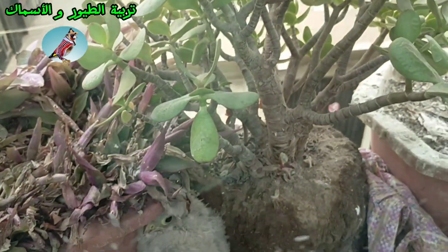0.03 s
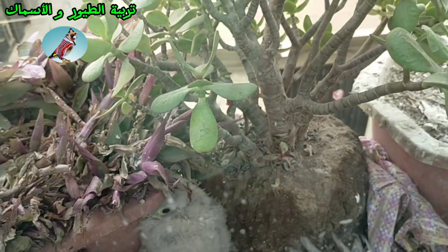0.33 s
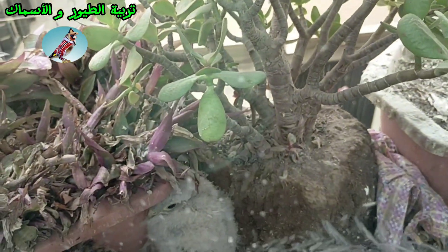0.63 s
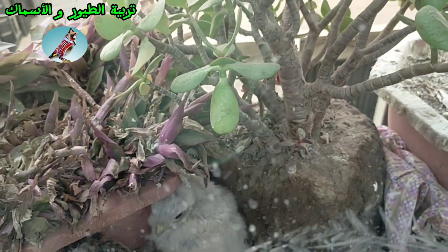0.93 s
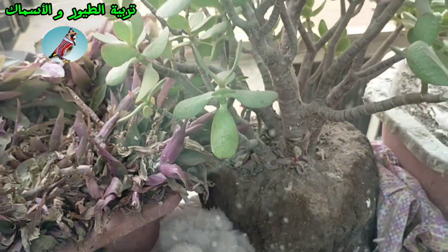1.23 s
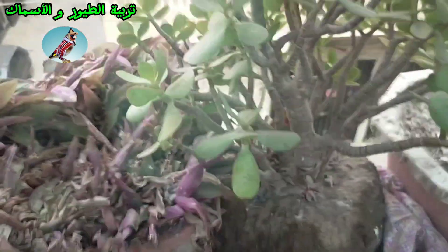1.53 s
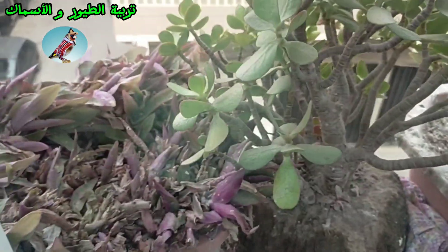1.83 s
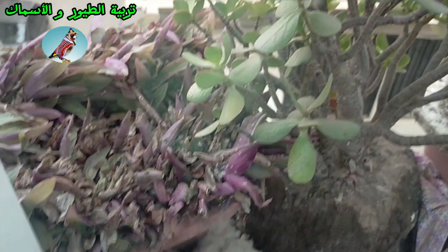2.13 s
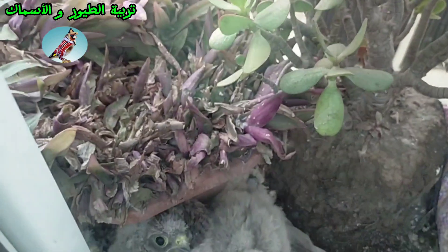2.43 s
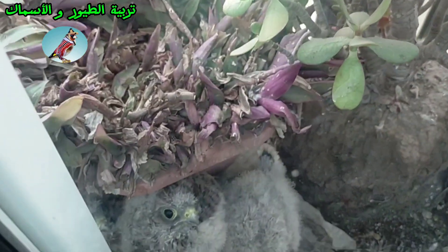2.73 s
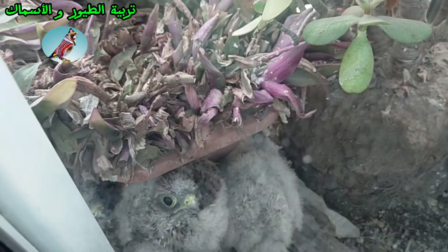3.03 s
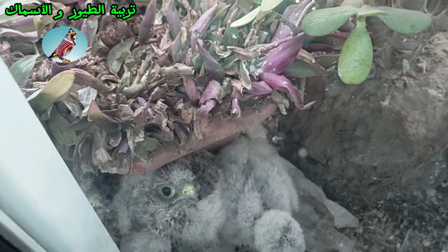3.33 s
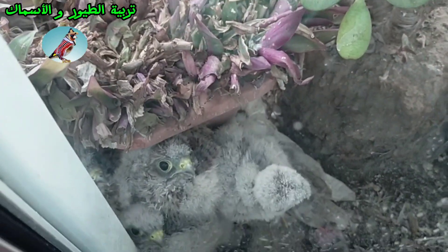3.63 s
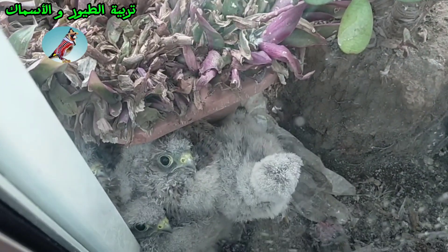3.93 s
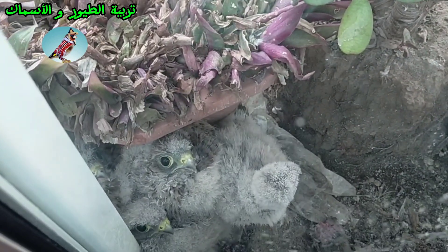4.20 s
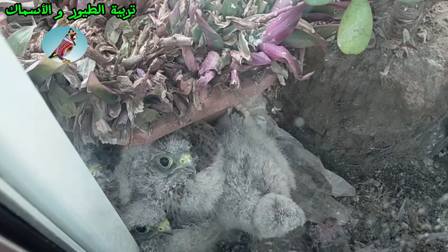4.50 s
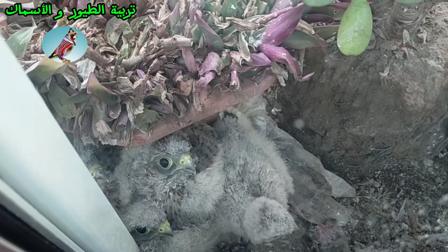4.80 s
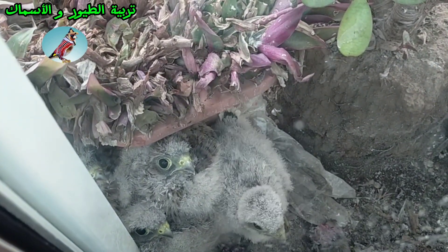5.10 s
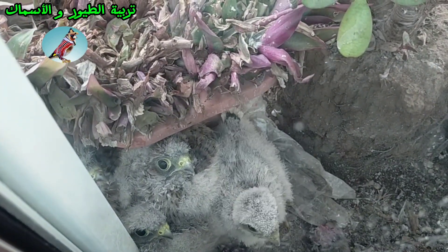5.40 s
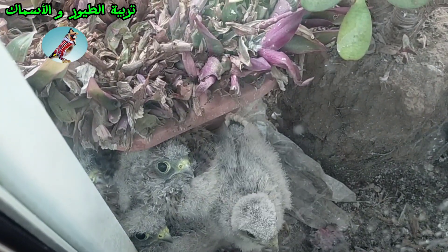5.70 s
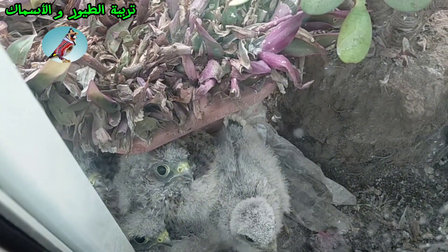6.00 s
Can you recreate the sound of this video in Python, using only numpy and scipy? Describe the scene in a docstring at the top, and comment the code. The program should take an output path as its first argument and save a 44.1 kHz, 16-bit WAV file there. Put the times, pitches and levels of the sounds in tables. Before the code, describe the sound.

A falcon chick begs up close with a fast high trill, thin whines and a hoarse chitter, over camera knocks and outdoor air.

```python
"""In a nook among flower pots on a ledge, kestrel chicks beg close to a hand-held camera.
The syrinx whistles when it vibrates regularly and rasps when it beats unevenly; the throat filters both.
A trill, cracking after each note, sinks to three thin whines, then restarts as a faster, hoarser chitter.
A faint peep and light ticks join in, and the walls throw short echoes back.
Over the outdoor air, the camera rumbles, rubs, clacks and rings as it is handled."""
import sys
import numpy as np
from scipy import signal
from scipy.fft import rfft, irfft, next_fast_len
from scipy.io import wavfile
from scipy.ndimage import uniform_filter1d

SR = 44100
rng = np.random.default_rng(int(sys.argv[2]) if len(sys.argv) > 2 else 0)


def int16_out(signal):
    """Quantize to a 16-bit WAV file."""
    q = np.round(np.clip(np.atleast_2d(signal).T, -1, 1) * 32767)
    wavfile.write(sys.argv[1], SR, q.astype(np.int16))


N = 266893
TIME = np.arange(N) / SR
# the throat's filter on the rasp: frequency_hz, trill_gain_db, chitter_gain_db
RASP_FILTER = [(450, -44, -55), (676, -24.5, -6), (860, -13.5, -6.5), (1050, -10, -3.5), (1345, -6.5, 2),
               (1427, 6, 4), (1623, 10.5, 6.5), (1940, -14, -15), (1990, -6.5, -2), (2545, -12, -7.5),
               (2520, -13, -12), (3300, -18.5, -28), (4630, -37.5, -80), (12000, -50, -59)]


def amp(db):
    """Decibels to amplitude ratio."""
    return 10 ** (np.asarray(db) / 20)


def unit(x):
    """Normalisation to rms 1."""
    return x / np.sqrt(np.mean(x ** 2) + 1e-20)


def follow(rows, at, **options):
    """Linear interpolation along a table's first column: one curve for each other column."""
    first, *columns = np.transpose(rows)
    return [np.interp(at, first, c, **options) for c in columns]


def colour(x, spectrum):
    """Spectral shaping by a gain curve drawn on a log-frequency axis."""
    hz, db = np.transpose(spectrum)
    log_hz = np.log(np.fft.rfftfreq(len(x), 1 / SR) + 1)
    return irfft(rfft(x) * amp(np.interp(log_hz, np.log(hz), db)), len(x))


def noise(spectrum, size=N):
    """Filtered white noise of rms 1."""
    return unit(colour(rng.standard_normal(next_fast_len(size)), spectrum)[:size])


def wander(rate_hz):
    """Random modulation: low-passed noise of rms 1."""
    size = next_fast_len(N)
    low_pass = np.exp(-(np.fft.rfftfreq(size, 1 / SR) / rate_hz) ** 2)
    return unit(irfft(rfft(rng.standard_normal(size)) * low_pass, size)[:N])


def add(mix, start_s, sound):
    """Superposition of a sound on the mix."""
    part = mix[max(round(start_s * SR), 0):][:len(sound)]
    part += sound[:len(part)]


def note_times(first_s, rate, count):
    """Repetition: each note follows the last by one period of the current rate."""
    times = [first_s]
    while len(times) < count:
        times.append(times[-1] + 1 / follow(rate, times[-1])[0])
    return np.array(times)


def air_and_handling():
    """Outdoor air, with the hand's rumble and friction noise; overlapping moves add in power."""
    # noise spectra: frequency_hz, relative_db
    air_spectrum = [(20, 10), (50, -1.5), (110, -12.5), (300, -17.5), (800, -22.5), (1500, -22.5),
                    (2800, -26), (4000, -32), (4700, -34.5), (4950, -26.5), (5300, -38), (10000, -41.5),
                    (16000, -32.5)]
    rumble_spectrum = [(15, -4.5), (40, 5), (70, -6), (140, -10.5), (200, -21), (300, -25.5), (900, -62)]
    rub_spectrum = [(100, -5.5), (500, -1.5), (1000, -1.5), (2200, 1.5), (4000, -13.5), (5500, -17.5),
                    (7800, -13.5), (10500, -24.5), (14500, -14.5), (16000, -19)]
    # moves of the hand on the camera: peak_s, half_length_s, rumble_db, rub_db
    hand_moves = [(0.08, 0.16, -24, -42.5), (0.291, 0.13, -25, -40), (0.558, 0.13, -33, -51),
                  (0.977, 0.13, -49, -51), (1.436, 0.38, -55, -47.5), (2.397, 0.61, -52.5, -54.5),
                  (3.359, 0.065, -48, -53), (3.612, 0.12, -40, -55), (6.05, 0.13, -61, -51)]
    rumble, rub = amp(-54), amp(-61)  # the hand held still
    for peak_s, half_length_s, rumble_db, rub_db in hand_moves:
        swell = np.exp(-((TIME - peak_s) / half_length_s) ** 2)
        rumble = np.hypot(rumble, amp(rumble_db) * swell)
        rub = np.hypot(rub, amp(rub_db) * swell)
    hand = rumble * noise(rumble_spectrum) + rub * amp(0.5 * wander(77)) * noise(rub_spectrum)
    air = amp(-44 + 1.8 * wander(5.3)) * noise(air_spectrum)
    return hand + air


def whistle(hz, bright_db):
    """Source and filter: harmonics of the syrinx's tone swell as they cross the throat's resonances."""
    # the throat's filter on the overtones: frequency_hz, gain_db
    resonances = [(2920, -13.5), (3080, -24.5), (3300, -27), (4400, -36.5), (5000, -37.5), (5900, -39),
                  (6700, -36.5), (7400, -37.5), (8300, -50.5), (8900, -45.5), (10300, -47.5), (11800, -49),
                  (13300, -35), (14500, -54.5)]
    phase = 2 * np.pi * np.cumsum(hz) / SR
    overtones = sum(amp(follow(resonances, k * hz)[0]) * np.sin(k * phase) for k in range(2, 10))
    return np.sqrt(2) * (np.sin(phase) + amp(bright_db) * overtones)


def rasp(hz, jitter, chaos, throat):
    """Subharmonics: the syrinx beats unevenly, once in four cycles; chaos is the noise's share of power."""
    cycles = np.cumsum(hz * (1 + jitter * wander(247.7))) / SR
    phase = 2 * np.pi * cycles / 4
    partials = sum(np.cos(k * phase + 2 * np.pi * rng.random()) for k in range(2, 9))
    beats = unit(colour(partials, throat))
    puffs = unit(colour(rng.standard_normal(N) * (1 + 0.55 * np.cos(phase)), throat))
    return (np.sqrt(1 - chaos) * beats + np.sqrt(chaos) * puffs) * amp(2.34 * wander(200))


def trill():
    """Register breaks: each note swells as it slides down, then cracks into a higher squeak and a rasp."""
    # the trill slows down: time_s, notes_per_s
    rate = [(0, 16.958), (.3, 13.724), (.8, 12.382), (1.5, 11.706), (2.5, 11.088)]
    # its slow course: time_s, level_db, pitch_hz, rasp_db
    course = [(0, -17.5, 1658, -37.5), (.19, -20.5, 1623, -43.5), (.28, -24, 1614, -37.5),
              (.49, -17, 1641, -40), (.76, -18.5, 1636, -47.5), (.88, -18.5, 1677, -37.5),
              (1.45, -17.5, 1667, -38.5), (2.1, -18.5, 1681, -38), (2.58, -20, 1663, -41.5)]
    # short pips first, then fuller notes: time_s, length_s
    lengths = [(.1, .012), (.4, .022), (.75, .024), (.92, .018), (1.5, .019), (2.58, .025)]
    # one note, timed from its peak: age_lengths, level_db, offset_hz, rasp_db
    note_shape = [(-2, -32, 130, -32), (-1.45, -18, 125, -16), (-.95, -21, 90, -13), (-.55, -3.5, 38, -19),
                  (0, 0, 4, -22), (.56, -1.5, -24, -16), (.92, -8, -78, 0), (1.28, -13.5, -68, -1),
                  (2, -21, -42, -4), (2.9, -44, -35, -22)]
    tone, hoarse, squeak, glide = np.zeros((4, N))
    for peak_s in note_times(.007, rate, count=33):
        db, hz, rasp_db = follow(course, peak_s)
        length_s = follow(lengths, peak_s)[0]
        db, hz = rng.normal([db, hz], scale=[.8, 6])
        age = (TIME - peak_s) / length_s
        near = (age > note_shape[0][0]) & (age < note_shape[-1][0])
        swell_db, offset_hz, break_db = follow(note_shape, age[near])
        gain = amp(db + swell_db * max(length_s / 0.01883, 1))  # long notes fade more steeply
        strain = np.clip((hz - 1580) / 95, .3, 1.15)  # higher notes slide further and crack harder
        tone[near] += gain
        glide[near] += gain * (hz + strain * offset_hz)
        hoarse[near] += amp(rasp_db + break_db)
        squeak[near] += strain ** 2 * amp(rasp_db + 5) * np.exp(-((age[near] - 1.05) / 0.17) ** 2)
    sounding = tone > 0  # between notes the pitch glides on
    hz = uniform_filter1d(np.interp(TIME, TIME[sounding], glide[sounding] / tone[sounding]), size=100)
    unrest = uniform_filter1d(hoarse / (hoarse + tone + 1e-9), size=200)  # the rasp shakes the tone
    voice = whistle(hz * (1 + (0.0023 + 0.0547 * unrest) * wander(211)), bright_db=-10.5)
    voice *= 1 + 2 * unrest * wander(270)
    crack = whistle(1.26 * hz * (1 + .02 * wander(200)), bright_db=-12)
    grit = rasp(hz, jitter=.07, chaos=.45, throat=[(f, db) for f, db, _ in RASP_FILTER])
    return amp(-1) * tone * voice + squeak * crack + amp(8.5) * hoarse * grit


def camera_knocks():
    """Impact excitation: a low thump, a rattle that rings the case's modes, and a bright snap."""
    # clacks and bumps: start_s, thump_db, body_db, snap_db, decay_s
    impacts = [(0.3036, -11.5, -7.5, -20, 0.0092), (0.343, -16, -12, -9, 0.0098),
               (0.509, -27.5, -32, -48, 0.022), (1.4697, -18, -26, -35.5, 0.0021),
               (1.523, -37.5, -41, -59.5, 0.0018), (1.592, -34, -33, -67, 0.0022),
               (1.67, -44.5, -34, -65, 0.0042), (2.1705, -60, -26, -34, 0.00079),
               (2.236, -29.5, -28, -32.5, 0.0022), (6.023, -57, -38.5, -72, 0.016)]
    # modes of the case: frequency_hz, relative_db, t60_s
    case_modes = [(565, -21.5, 0.1), (897, 2, 0.12), (1780, 17.5, 0.029), (2300, -1.5, 0.015),
                  (2377, 8, 0.033), (2790, 4, 0.036), (2750, -18.5, .06), (4000, -23.5, 0.056)]
    # noise spectra of a knock: frequency_hz, relative_db
    body_spectrum = [(100, 0), (270, -11), (450, -1.5), (1000, -6.5), (1800, 1.5), (3000, -10.5),
                     (4000, -16), (5500, -24.5), (12000, -31.5)]
    snap_spectrum = [(2000, -28), (5000, -23), (6800, -10), (8000, 8), (9500, -9), (11500, -10.5),
                     (14000, -10), (16000, 4)]
    out, t = np.zeros(N), np.arange(SR // 4) / SR
    ring = sum(amp(db - 60 * t / t60) * np.sin(2 * np.pi * hz * t) for hz, db, t60 in case_modes)
    for start_s, thump_db, body_db, snap_db, decay_s in impacts:
        fade = np.exp(-t / decay_s)
        age = t / (0.69 * decay_s)
        thump = 3 * age * (2 - age) * np.exp(-age)
        body = noise(body_spectrum, size=len(t)) * (fade + amp(-20) * np.exp(-t / 0.067))
        body += 0.23 * ring * np.exp(-t / (3 * decay_s))  # each knock damps the modes further
        snap = noise(snap_spectrum, size=len(t)) * (fade + 11 * decay_s * np.exp(-t / .04))
        add(out, start_s, amp(thump_db) * thump + amp(body_db) * body + amp(snap_db) * snap)
    return out


def ticks_and_case_ring():
    """Damped oscillation: light ticks, and the low ring of the camera case when it is bumped."""
    # high ticks and low rings of the case: start_s, relative_db, pitch_hz, decay_s
    rings = [(.511, -18, 460, 0.0046), (1.573, -28.5, 2870, 0.0015), (1.619, -25.5, 2670, 0.0023),
             (1.673, -24, 2570, 0.0025), (6.021, -38, 317, 0.012), (6.024, -32.5, 500, 0.0039)]
    out, t = np.zeros(N), np.arange(SR // 8) / SR
    for start_s, db, hz, decay_s in rings:
        add(out, start_s, amp(db + 2) * np.sin(2 * np.pi * hz * t) * np.exp(-t / decay_s))
    return out


def peep():
    """Joint modulation: a faint, unsteady whistle rises and falls in both level and pitch."""
    start_s, length_s = .52, .27
    arch = np.sin(np.pi * np.clip((TIME - start_s) / length_s, 0, 1))
    hz = 2230 + 93.3 * arch
    return amp(-47) * arch * whistle(hz * (1 + .035 * wander(200)), bright_db=-11)


def whines():
    """A changing vocal filter: long notes brighten as the beak opens, and fray as they die."""
    # three whines: start_s, length_s, level_db, attack_s, release_s, open_beak_db, rasp_db
    calls = [(2.629, .32, -26.5, 0.084, 0.22, -1, -57), (2.949, 0.41, -35.5, 0.018, 0.089, 4, -45.5),
             (3.367, 0.47, -33.5, 0.17, 0.29, 7, -57)]
    # each sinks from a high start: time_s, pitch_hz
    pitch = [(2.63, 1678), (2.72, 1631), (2.76, 1525), (2.92, 1468), (2.95, 1584), (2.99, 1519),
             (3.1, 1461), (3.19, 1510), (3.27, 1500), (3.33, 1432), (3.37, 1600), (3.41, 1465),
             (3.79, 1471)]
    shut_beak_db, fray_width_s = -8, 0.051
    effort, hoarse, opening_db = np.zeros((3, N))
    for start_s, length_s, db, attack_s, release_s, open_beak_db, rasp_db in calls:
        age = TIME - start_s
        rise = np.clip(age / attack_s, 0, 1) ** 0.51
        fall = np.clip((length_s - age) / release_s, 0, 1) ** 1.56
        effort += amp(db) * rise * fall
        gape = np.sin(np.pi * np.clip(age / length_s, 0, 1) ** 1.5)  # widest late in the whine
        opening_db += (open_beak_db - shut_beak_db) * gape
        hoarse += amp(rasp_db) * np.exp(-((age - 0.83 * length_s) / fray_width_s) ** 2)
    hz = follow(pitch, TIME)[0]
    waver = amp(3.2 * wander(32))
    voice = whistle(hz * (1 + 0.0042 * wander(146)), bright_db=shut_beak_db + opening_db)
    frayed = whistle(hz * (1 + 0.034 * wander(253)), bright_db=14) * amp(4.7 * wander(250))
    return effort * waver * voice + amp(-7) * hoarse * frayed


def chitter():
    """Frequency modulation: about twenty pitch sweeps a second, narrowing as the chick settles."""
    # the chitter speeds up, then tires: time_s, notes_per_s
    rate = [(3.85, 19.243), (3.95, 22.192), (4.55, 21.814), (5.4, 19.055), (6, 18.285)]
    # its slow course: time_s, level_db, top_hz, settled_fraction, relative_rasp_db
    course = [(3.84, -33.5, 2237, 0.02, -18), (3.92, -39, 2286, 0.04, -5), (4.04, -35.5, 2150, 0.04, -6),
              (4.6, -32.5, 2028, 0.14, -6), (5, -31, 1874, .48, -5), (5.18, -29, 1767, 0.64, -8),
              (5.34, -31, 1688, 0.73, -4.5), (6.05, -30, 1692, 0.64, -5)]
    # one sweep, timed from its peak level: age_cycles, height_fraction, excited_db, settled_db, rasp_db
    sweep_shape = [(-.5, .96, -6.5, -19, -9), (-.36, .97, -5, -30, -5.5), (-.13, .95, -4.5, -2, -7),
                   (0, .42, 0, -1, 1), (.15, .03, -14, -6, 1.5), (.3, .1, -13, -8, -5),
                   (.38, .93, -10, -8, -9)]
    db, top_hz, settled, rasp_db = follow(course, TIME)
    peaks_s = note_times(3.8553, rate, count=45)
    limp = np.resize([-1, 1], len(peaks_s))  # every second note is louder and, once settled, late
    peaks_s += limp * 0.0017 * np.interp(peaks_s, TIME, settled)
    padded_s = np.r_[2 * peaks_s[0] - peaks_s[1], peaks_s, 2 * peaks_s[-1] - peaks_s[-2]]
    cycle = np.interp(TIME, padded_s, np.arange(len(padded_s)))
    height, excited_db, settled_db, break_db = follow(sweep_shape, cycle, period=1)
    bottom_hz = 1507.4 + 95.54 * settled
    hz = bottom_hz + height * (top_hz - bottom_hz)
    onset = np.clip((TIME - 3.838) / 0.0025, 0, 1)
    effort = amp(db + 0.13 * np.interp(TIME, peaks_s, limp)) * onset
    strain_db = 12 * height * (1 - settled)  # brightest at the top of a wide sweep
    crack = amp(break_db) * (1 - settled)  # shakes pitch and level on the way down
    voice = whistle(hz * (1 + (0.01285 + .028 * crack) * wander(289)), bright_db=strain_db - 6)
    shake_db = (.5 + 2.5 * crack) * wander(280)
    voice *= amp(2 + excited_db + settled * (settled_db - excited_db) + shake_db)
    throat = [(f, db) for f, _, db in RASP_FILTER]
    grit = rasp(1.02 * hz, jitter=0.04154, chaos=.6 - .25 * settled, throat=throat)
    # once settled, the beats lock into side tones near three quarters and three halves of the pitch
    phase = 2 * np.pi * np.cumsum(hz * (1 + .03 * wander(205.4))) / SR
    side_tones = amp(-0.5) * np.sin(.775 * phase) + amp(-5) * np.sin(1.5 * phase)
    roughness = amp(-8 * settled) * grit + settled * side_tones
    return effort * (voice + amp(rasp_db + break_db) * roughness)


def nook(x, tail_db, t60_s):
    """Reflection: early wall echoes and a short diffuse tail join the direct sound."""
    # nearby walls: delay_s, gain_db
    echoes = [(.0042, -39), (.0112, -14.5), (.023, -11)]
    t = np.arange(SR // 2) / SR
    response = rng.standard_normal(len(t)) * amp(-60 * t / t60_s) * (t > .012)
    response *= amp(tail_db) / np.linalg.norm(response)
    for delay_s, db in echoes:
        response += amp(db) * np.sinc((t - delay_s) * SR)
    return x + signal.fftconvolve(x, response)[:N]


def scene():
    """Superposition: calls, ticks and the case's low ring echo; knocks, handling and air arrive direct."""
    in_nook = trill() + whines() + peep() + chitter() + ticks_and_case_ring()
    return (nook(in_nook, tail_db=-11, t60_s=.18) + camera_knocks() + air_and_handling())[None]


def record(dry):
    """Saturation and band limiting: the microphone clips any overload, then a low-pass trims the top."""
    low_pass = signal.firwin(511, cutoff=15900, window=("kaiser", 9), fs=SR)
    return signal.oaconvolve(np.clip(dry, -1, 1), low_pass[None], "same")


dry = scene()
out = record(dry)
int16_out(out)
```